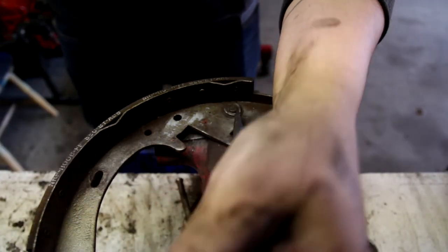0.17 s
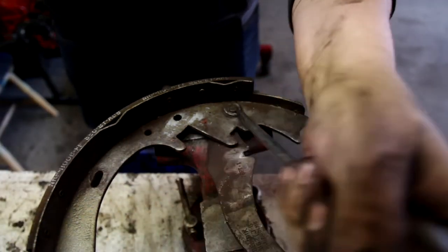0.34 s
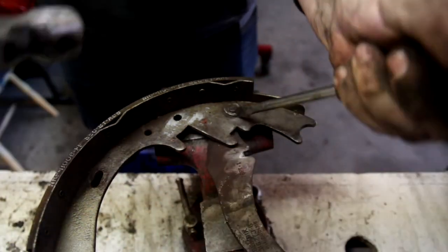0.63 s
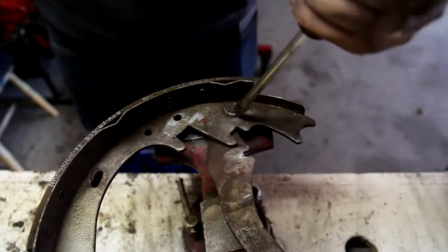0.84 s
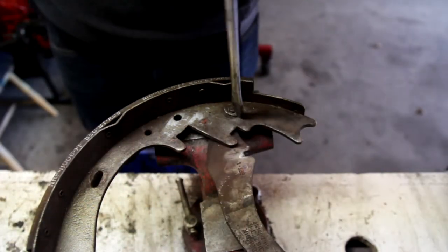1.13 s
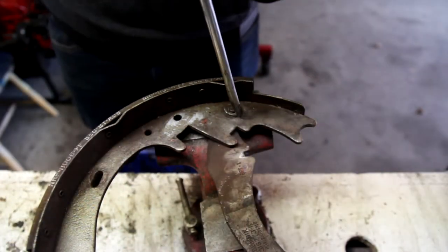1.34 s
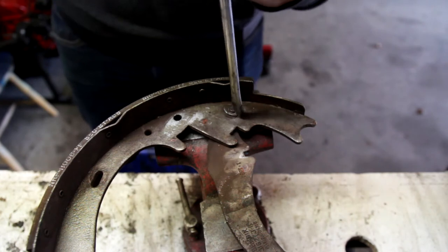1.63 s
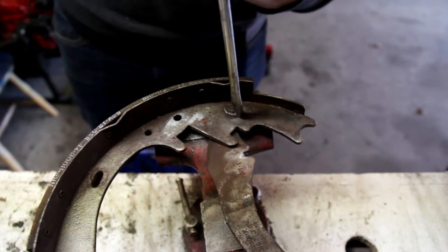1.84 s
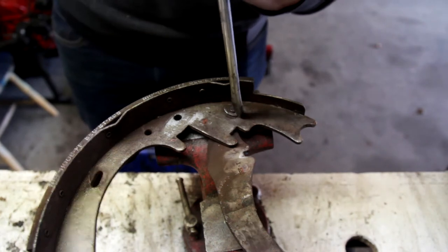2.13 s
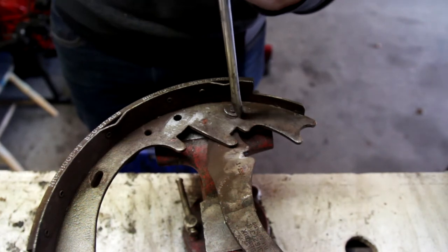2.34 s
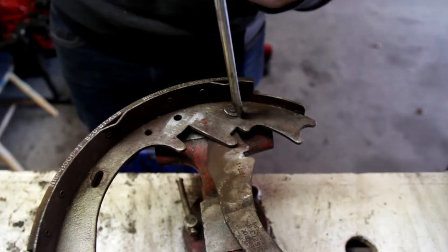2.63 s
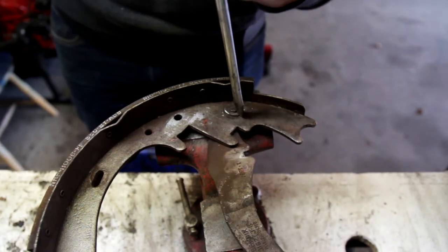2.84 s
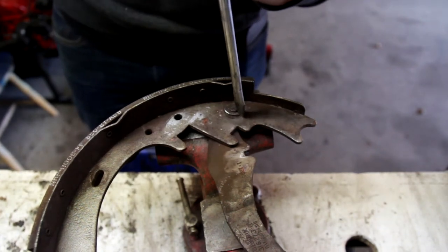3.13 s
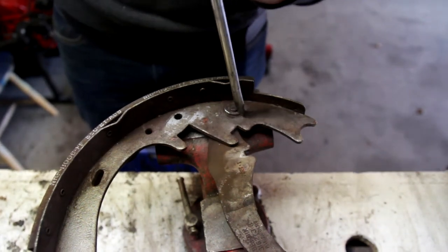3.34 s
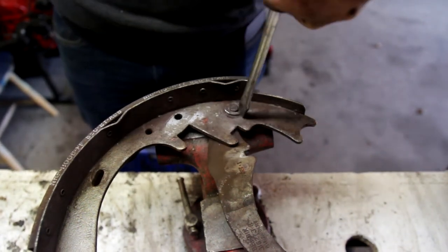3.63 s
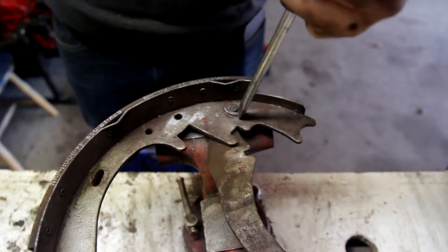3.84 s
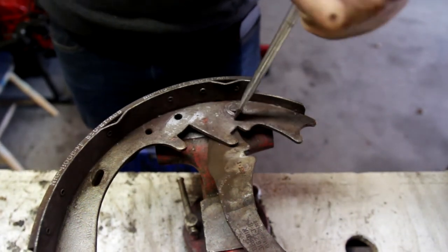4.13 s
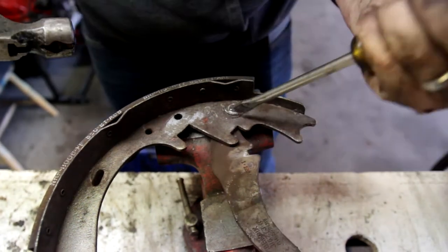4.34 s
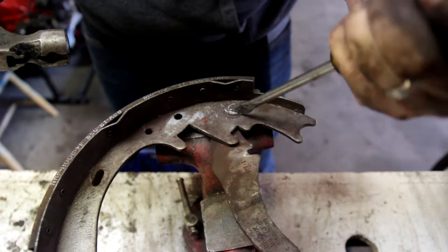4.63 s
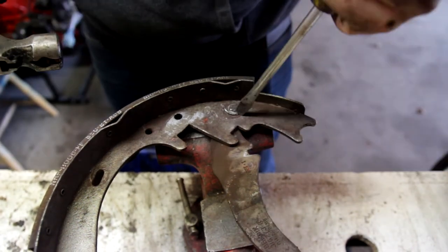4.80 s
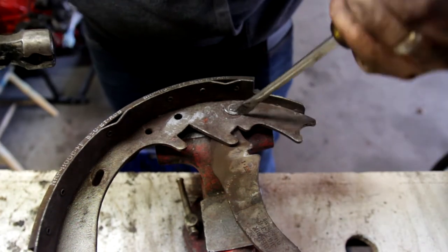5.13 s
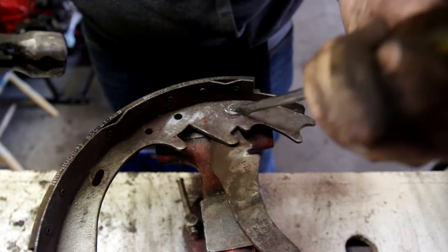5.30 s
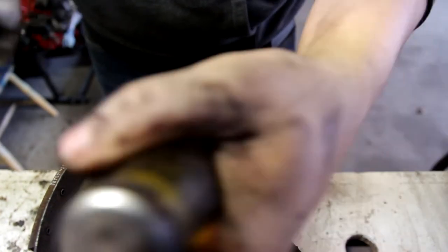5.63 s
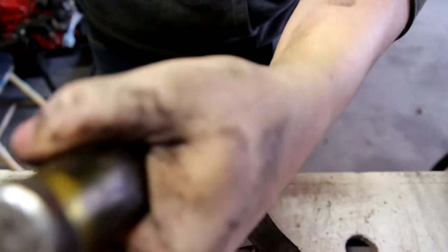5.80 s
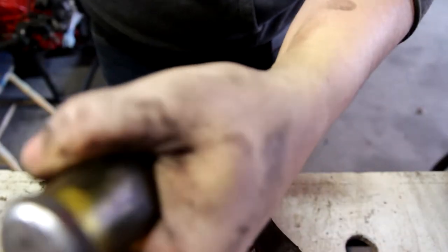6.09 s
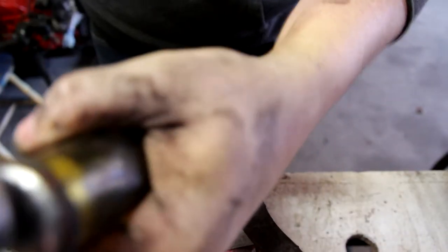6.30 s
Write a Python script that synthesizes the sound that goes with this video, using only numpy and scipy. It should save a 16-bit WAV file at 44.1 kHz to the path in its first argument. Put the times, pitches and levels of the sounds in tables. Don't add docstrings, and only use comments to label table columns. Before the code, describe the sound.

Close, overloaded hammer blows on a screwdriver clank against a steel brake part in a vise, with ticks, scrapes and faint garage hum.

```python
import sys
import numpy as np
from scipy import signal
from scipy.fft import rfft, irfft
from scipy.io import wavfile
from scipy.ndimage import uniform_filter1d, map_coordinates

SR = 44100
rng = np.random.default_rng(int(sys.argv[2]) if len(sys.argv) > 2 else 0)


def field_ratio(decibels):
    return 10 ** (np.asarray(decibels, dtype=float) / 20)


def generate_wav(sig):
    pcm = np.round(np.clip(np.atleast_2d(sig).T, -1, 1) * 32767).astype(np.int16)
    wavfile.write(sys.argv[1], SR, pcm)


N = 284797


def along(points, hz):
    point_hz, value = np.transpose(points)
    return np.interp(np.log(hz + 1), np.log(point_hz + 1), value)


def curves(rows):
    s, *columns = np.transpose(list(rows))
    return [np.interp(np.arange(N) / SR, s, column) for column in columns]


def noise(spectrum, count):
    white = rfft(rng.standard_normal(count))
    x = irfft(white * field_ratio(along(spectrum, np.fft.rfftfreq(count, 1 / SR))), count)
    return x / np.std(x)


def band(hz, width):
    low_skirt = [(max(hz - 4 * width, 20), -45), (max(hz - width / 2, 30), -3)]
    high_skirt = [(hz + width / 2, -3), (hz + 4 * width, -45)]
    return low_skirt + [(hz, 0)] + high_skirt


def fade(t, t60, rise):
    return field_ratio(-60 * t / t60) * (1 - np.exp(-t / rise))


def ring(modes, t, scatter_db):
    hz, db, t60 = np.transpose(modes)[:, :, None]
    size = field_ratio(db + scatter_db * rng.standard_normal(hz.shape))
    return (size * field_ratio(-60 * t / t60) * np.sin(2 * np.pi * hz * t)).sum(0)


def add(out, s, x):
    start = round(s * SR)
    x = x[max(-start, 0):]
    out[max(start, 0):][:len(x)] += x


def garage(x, wet_db, rise):
    # hz, t60_s
    room_decay = [(50, 0.99), (200, 0.41), (700, 0.6), (2000, 0.51), (5000, 0.42), (9000, 0.24),
                  (15000, 0.12)]
    hz, t, z = signal.stft(rng.standard_normal(len(x)), SR, nperseg=256)
    decaying = z * fade(t, along(room_decay, hz)[:, None], rise)
    tail = signal.istft(decaying, SR, nperseg=256)[1][:len(x)]
    size = len(x) + 4096
    power = np.abs(rfft(x, size)) ** 2
    colour = np.sqrt(np.abs(uniform_filter1d(power, size=round(200 * size / SR))))
    wet = irfft(rfft(tail / np.linalg.norm(tail), size) * colour, size)[:len(x)]
    return x + field_ratio(wet_db) * wet * fade(np.arange(len(x)) / SR, 4, .004)


def background():
    # hz, level_db (per Hz)
    hum_spectrum = [(14, -23.5), (38, -5), (168, -7), (201, -11.5), (240, -8.5), (352, -14.5), (525, -14.5),
                    (580, -12), (629, -12), (1120, -14), (1240, -16), (1680, -24), (3000, -31.5),
                    (3900, -67.5), (6600, -120)]
    # hz, level_db (per Hz)
    hiss_spectrum = [(1180, -28.5), (2000, -13), (2800, 1), (3910, 1.5), (5240, -0.5), (15100, -4.5),
                     (16100, -6.5), (16500, -26)]
    # fall_start_s, fall_end_s, rise_start_s, rise_end_s, depth_db
    ducks = [
        (-0.45, -.5, 0.36, 0.41, 14.5),
        (1.4, 1.67, 3.23, 3.74, 15.5),
        (5.5, 6.5, 6.9, 7.1, 11.5),
    ]
    hum_db, hiss_db = -49, -62.5
    drone_hz, drone_width_hz, drone_db = 173, 13, -7
    volume_db = sum(curves(zip(turns, [0, -depth_db, -depth_db, 0]))[0] for *turns, depth_db in ducks)
    swell = map_coordinates(rng.standard_normal(60), [np.arange(N) * 7 / SR])
    drone = field_ratio(drone_db) * noise(band(drone_hz, drone_width_hz), N)
    hum = field_ratio(hum_db + 1.4 * swell) * (noise(hum_spectrum, N) + drone)
    hiss = field_ratio(hiss_db) * noise(hiss_spectrum, N)
    return field_ratio(volume_db) * (hum + hiss)


def thuds():
    # start_s, level_db
    pushes = [
        (.13, -45.5),
        (.955, -40),
        (4.409, -33),
        (4.787, -35),
        (5.263, -37.5),
        (5.385, -36.5),
    ]
    thud_hz, width_hz, t60_s, rise_s = 190, 130, .2, .012
    out, t = np.zeros(N + SR), np.arange(16384) / SR
    for s, db in pushes:
        boom = noise(band(thud_hz, width_hz), len(t)) * fade(t, t60_s, rise_s)
        add(out, s, field_ratio(db) * boom * 2)
    return out[:N]


def jolts():
    # hit_s, then a list of delay_s, level_db
    rockings = [
        (6.0866, [(.023, -30), (.044, -22.5)]),
        (6.3346, [(.02, -16.5), (.038, -23), (.053, -17.5), (.072, -23)]),
    ]
    rock_hz, sag_s = 136, 0.132
    out = np.zeros(N + SR)
    for hit, rocks in rockings:
        for delay, db in rocks:
            hz = rock_hz * np.exp(-delay / sag_s)
            turn = np.arange(int(1.6 * SR / hz)) * hz / SR
            swing = np.sin(2 * np.pi * turn) * np.sqrt(np.hanning(len(turn)))
            add(out, hit + delay, field_ratio(db) * swing)
    return out[:N]


def rubs():
    # start_s, length_s, level_db, pitch_hz, width_hz
    drags = [
        (0.844, 0.11, -40, 890, 398),
        (.86, 0.048, -58.5, 2200, 1800),
        (3.984, 0.053, -56, 3000, 1500),
    ]
    out, t = np.zeros(N + SR), np.arange(32768) / SR
    for s, length, db, hz, width in drags:
        stroke = np.sqrt(np.sin(np.pi * np.clip(t / length, 0, 1) ** .5).clip(0))
        catch = field_ratio(1.5 * map_coordinates(rng.standard_normal(99), [t * 60]))
        add(out, s, field_ratio(db) * stroke * catch * noise(band(hz, width), len(t)))
    return out[:N]


def ticks():
    # start_s, tick_db, shoe_db (against the tick), tick_hz, shoe_hz
    slips = [(.4234, -43, -10, 1660, 830), (.5277, -39, -10, 2900, 820), (1.0135, -55, 18, 1450, 1010),
             (3.8208, -28, 0, 1720, 600), (3.8212, -37, -20, 2900, 580), (3.838, -41, 6, 1650, 580),
             (4.0045, -42, -3, 1560, 650), (4.0194, -45, 9, 1800, 810), (4.4262, -22, 9, 1770, 860),
             (4.428, -25, -6, 3400, 860), (4.6044, -59, 23, 2400, 590), (4.786, -43, 13, 2900, 850),
             (5.2538, -16, 5, 2200, 830), (5.2545, -25, -5, 3300, 950), (5.256, -19, -5, 1390, 950),
             (5.3762, -26, 0, 2090, 850), (5.3765, -38, -20, 4500, 850), (5.4959, -43, -25, 4300, 900),
             (5.5094, -41, -25, 4730, 670), (5.6092, -39, -25, 5240, 600)]
    tick_cycles = 70
    out, t = np.zeros(N + SR), np.arange(16384) / SR
    for s, db, shoe_db, tick_hz, shoe_hz in slips:
        click = noise(band(tick_hz, .55 * tick_hz), len(t)) * fade(t, .022, .0003)
        tick = click + ring([(tick_hz, -4, tick_cycles / tick_hz)], t, 0)
        shoe = 0.59 * noise(band(shoe_hz, 520), len(t)) + ring([(shoe_hz, 0, .2)], t, 0)
        shoe = shoe * fade(t, 0.13, 0.005)
        add(out, s, field_ratio(db) * garage(tick + field_ratio(shoe_db) * shoe, wet_db=-17, rise=.008))
    return out[:N]


def hammer_head():
    # pitch_hz, t60_s
    head_modes = [(5062.5, .21), (5049, .5)]
    # start_s, level_db, partner_db (lower mode), loose_grip (0.5-2, scales t60)
    rings = [
        (.124, -37.5, -11.5, 0.89),
        (1.8921, -2, -13, 0.93),
        (2.1666, 3, -14, 0.95),
        (2.4544, 0.5, -15.5, 0.76),
        (2.7391, -6.5, -17, 1.06),
        (3.0195, -5.5, -15.5, 1.02),
        (3.2951, -4.5, -20, 0.81),
        (6.0872, -18.5, -13.5, 0.53),
        (6.3334, -10, -32, 1.4),
    ]
    out, t = np.zeros(N + SR), np.arange(SR) / SR
    (upper_hz, upper_t60), (lower_hz, lower_t60) = head_modes
    for s, db, partner_db, loose in rings:
        pair = ring([(upper_hz, 0, loose * upper_t60), (lower_hz, partner_db, loose * lower_t60)], t, 0)
        add(out, s, field_ratio(db) * pair * (1 - np.exp(-t / .011)) ** 2)
    return out[:N]


def contacts(events, length, lever_db, modes_db, wet_db, boom_db):
    # pitch_hz, level_db, t60_s
    shoe_modes = [(580, -5, .12), (860, -5, .1), (960, 0, .1), (1025, 0, .1), (1400, -8, .06),
                  (982, -18, .3)]
    # pitch_hz, level_db, t60_s
    lever_modes = [(1750, -7, .05), (2200, -3, .04), (2580, -3, .05), (3450, -1, .035), (3730, -2, .025)]
    # hz, level_db (per Hz)
    bench_spectrum = [(18, -24.5), (45, -1.5), (100, -9.5), (200, -3), (350, -7), (600, -15.5), (1200, -72)]
    # hz, level_db (per Hz)
    crack_spectrum = [(200, -50), (600, -30), (1500, -1), (3000, 5), (4500, -4), (7000, -12.5),
                      (10000, -60.5), (14000, -88.5)]
    # hz, level_db (per Hz)
    treble_spectrum = [(2000, -32.5), (4500, 0.5), (6000, -2.5), (9000, -1.5), (14000, -5.5),
                       (17000, -29.5)]
    # hz, level_db (per Hz)
    boom_spectrum = [(15, -29.5), (35, -15), (60, -0.5), (95, 0), (130, -3.5), (200, -23), (300, -51)]
    # hz, level_db (per Hz)
    clank_spectrum = [(250, -24), (550, 4), (1200, 1), (2000, -11.5), (4000, -53.5)]
    out, t = np.zeros(N + SR), np.arange(32768) / SR
    for s, db, bench_db, shoe_db, treble_db in events:
        crack = noise(crack_spectrum, len(t)) * fade(t, length, 0.00036)
        lever = field_ratio(lever_db) * ring(lever_modes, t, 1.5)
        treble = noise(treble_spectrum, len(t)) * fade(t, 0.71 * length, 0.00007)
        clank = noise(clank_spectrum, len(t)) * fade(t, 2.2 * length, .001)
        shoe = clank + field_ratio(modes_db) * ring(shoe_modes, t, 2.5) * (1 - np.exp(-t / .002))
        bench = noise(bench_spectrum, len(t)) * fade(t, 0.21, 0.0056)
        boom = 9 * noise(boom_spectrum, len(t)) * fade(t, 0.31, 0.069) ** 2
        steel = crack + .45 * lever + field_ratio(treble_db) * treble
        struck = steel + field_ratio(shoe_db) * shoe + field_ratio(bench_db) * bench
        roomy = garage(struck, wet_db, rise=0.14 * length)
        add(out, s, field_ratio(db) * (roomy + 1.3 * lever + field_ratio(boom_db) * boom))
    return out[:N]


def firm_taps():
    # start_s, crack_db, bench_db, shoe_db, treble_db (the last three against the crack)
    taps = [
        (-.05, -19.5, -19.5, -3, -33),
        (.1239, -26, -4.5, 4.5, -30),
        (.948, -18, -13.5, 6, -18),
        (4.4075, -25.5, -10, -2, -13),
        (6.0872, -2.5, -23, -8.5, -7),
    ]
    return contacts(taps, length=0.016, wet_db=-17, boom_db=-24.5, lever_db=-5.5, modes_db=-3)


def hard_blows():
    # start_s, crack_db, bench_db, shoe_db (the last two against the crack)
    blows = [
        (1.8921, -4, -7, -6),
        (2.1663, -2, -6.5, -1),
        (2.4543, 1, -6, -4),
        (2.7389, 1.5, -6, -2.5),
        (3.0196, 2, -8.5, -4),
        (3.2952, 4.5, -10.5, -1.5),
        (6.3331, -9.5, -13, -8.5),
    ]
    treble_base_db, treble_lag = -9, 0.34
    struck = [(s, db, bench_db, shoe_db, treble_base_db - treble_lag * db)
              for s, db, bench_db, shoe_db in blows]
    return contacts(struck, length=0.068, wet_db=-14.0, boom_db=-21.5, lever_db=-14, modes_db=-14)


def scene():
    # time_s, gain_db
    recovery = [(3.38, -5), (3.55, 3), (3.75, 17)]
    recovery_db = curves(recovery)[0] * (np.arange(N) < 4 * SR)
    hammering = (hard_blows() + hammer_head()) * field_ratio(recovery_db)
    handling = firm_taps() + ticks() + thuds() + jolts() + rubs()
    return np.tile(hammering + handling + background(), (2, 1))


def low_pass(x):
    return signal.sosfilt(signal.butter(12, 16800, fs=SR, output="sos"), x)


def record(dry):
    # time_s, level_db
    ceiling = [(1.5, -4.5), (1.8, -10.6), (3.5, -10.6), (3.8, -4.5), (6.2, -4.5), (6.3, -8.8)]
    # hz, level_db
    apart = [(30, -27), (500, -42), (3000, -31), (6000, -29), (9000, -20), (14000, -17)]
    top = field_ratio(curves(ceiling)[0])
    flat = dry / (1 + np.abs(dry / top) ** 16) ** (1 / 16)
    coupling_capacitor = signal.butter(1, 10, "high", fs=SR, output="sos")
    blocked = signal.sosfilt(coupling_capacitor, flat[0])
    band_limit = signal.cheby2(12, 60, 17100, fs=SR, output="sos")
    mid = signal.sosfilt(band_limit, blocked)
    hz, _, z = signal.stft(mid, SR, nperseg=256)
    random_phase = np.exp(2j * np.pi * rng.random(z.shape))
    smeared = z * field_ratio(along(apart, hz))[:, None] * random_phase
    smear = signal.istft(smeared, SR, nperseg=256)[1][:N]
    return low_pass(np.array([mid + smear, mid - smear]))


dry = scene()
out = record(dry)
generate_wav(out)
```